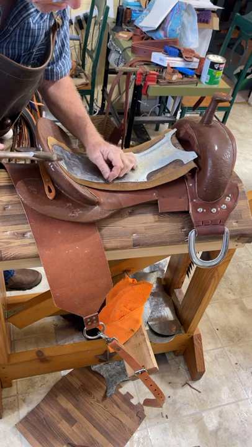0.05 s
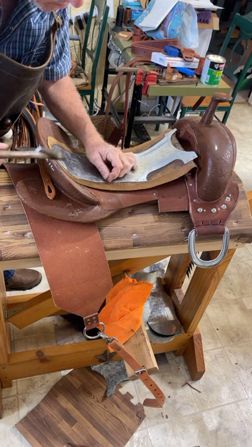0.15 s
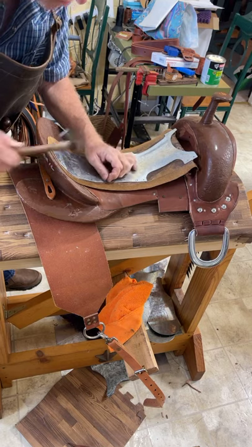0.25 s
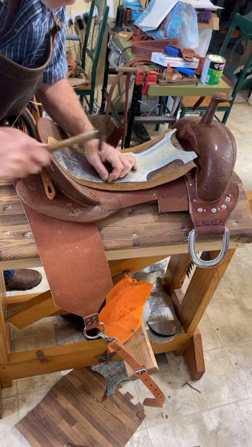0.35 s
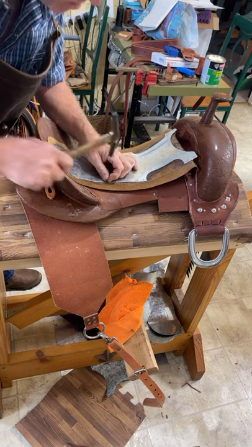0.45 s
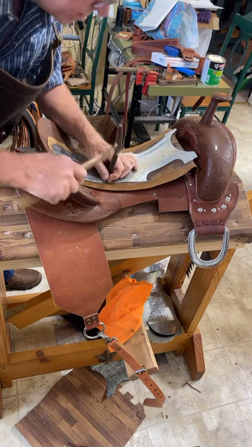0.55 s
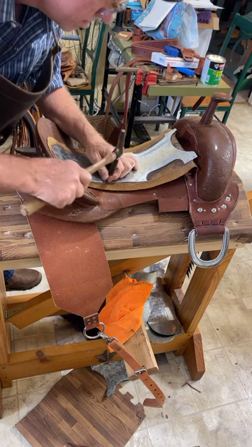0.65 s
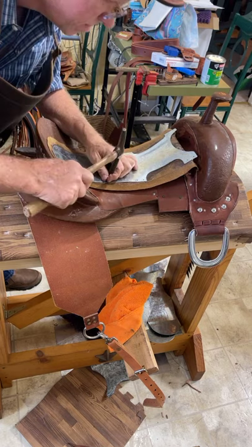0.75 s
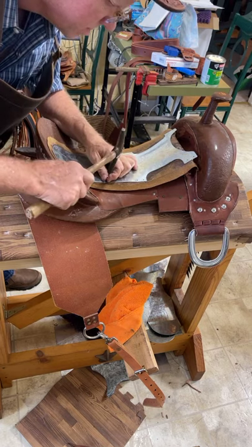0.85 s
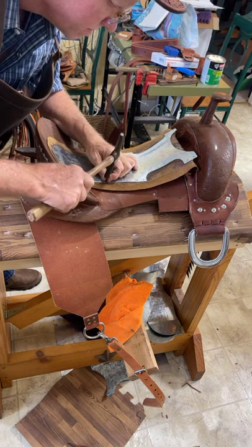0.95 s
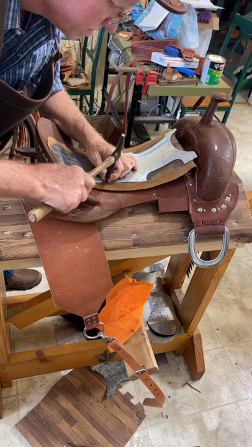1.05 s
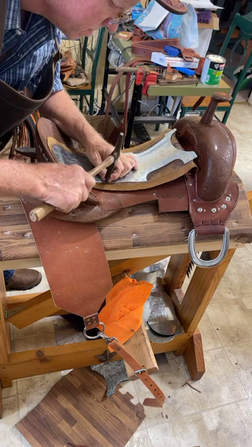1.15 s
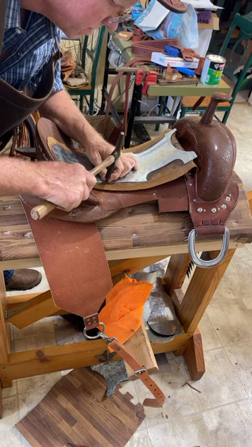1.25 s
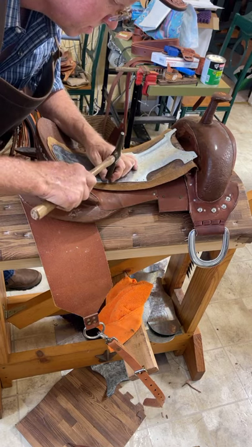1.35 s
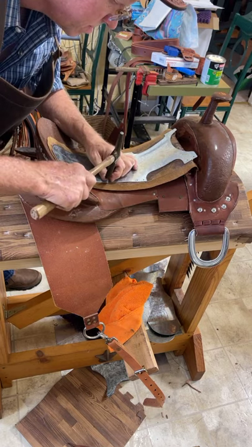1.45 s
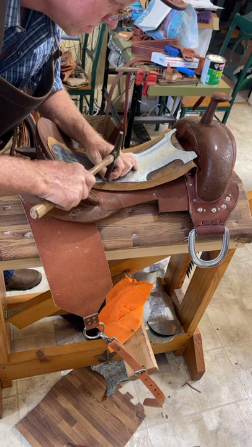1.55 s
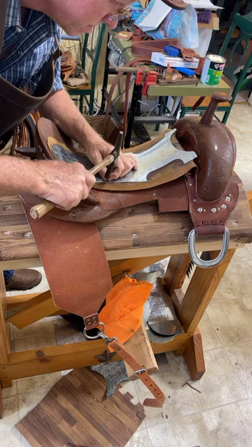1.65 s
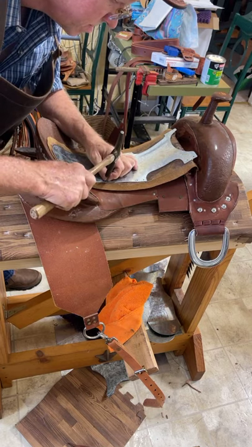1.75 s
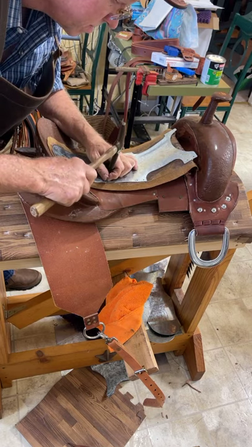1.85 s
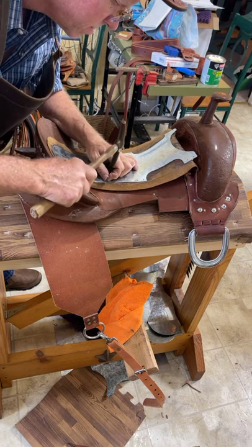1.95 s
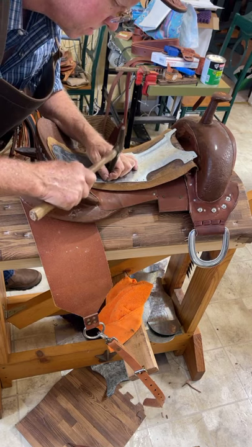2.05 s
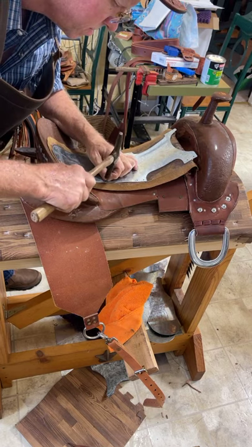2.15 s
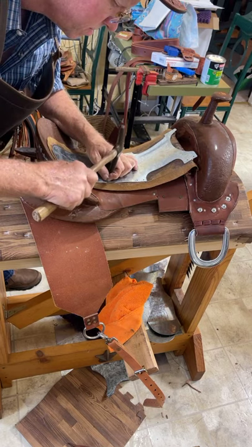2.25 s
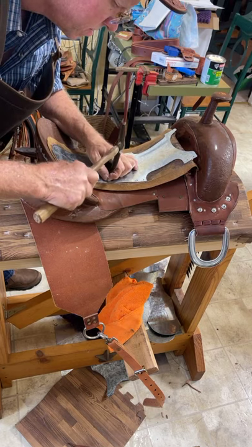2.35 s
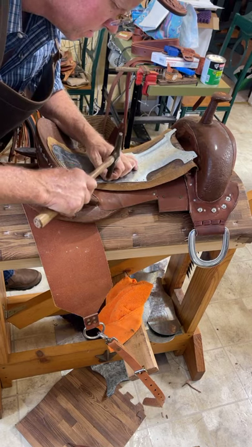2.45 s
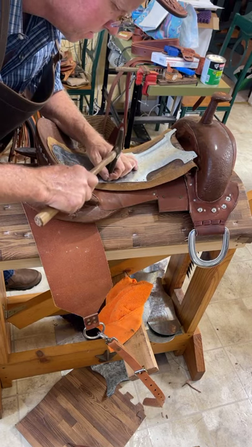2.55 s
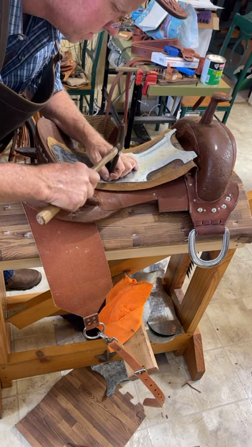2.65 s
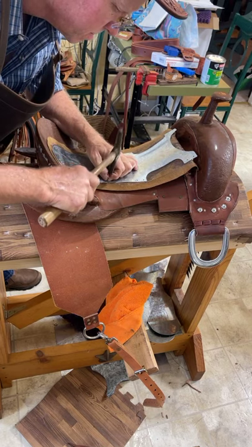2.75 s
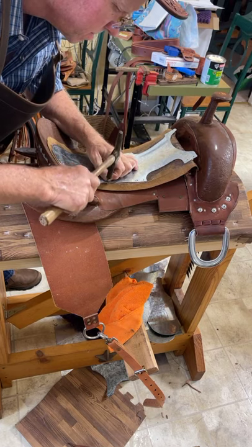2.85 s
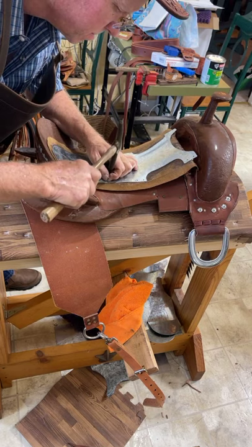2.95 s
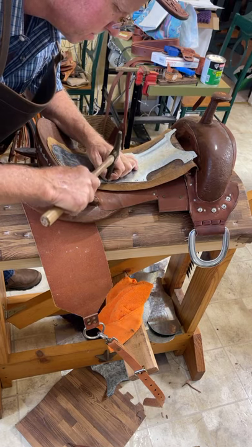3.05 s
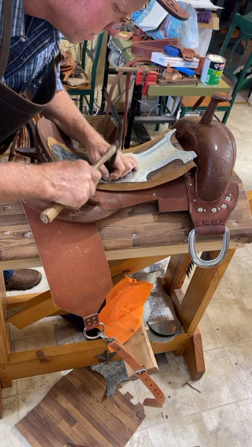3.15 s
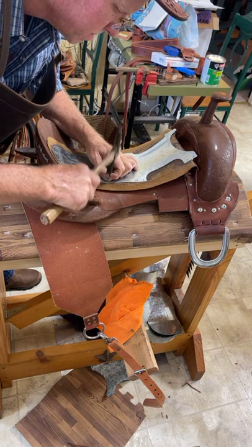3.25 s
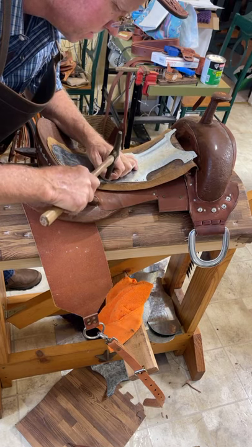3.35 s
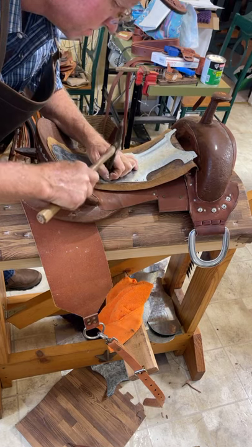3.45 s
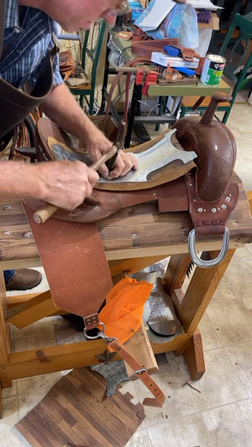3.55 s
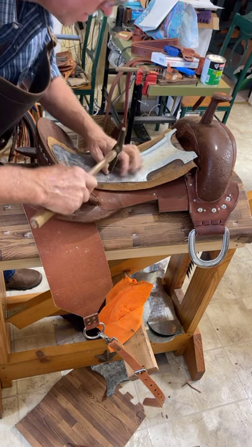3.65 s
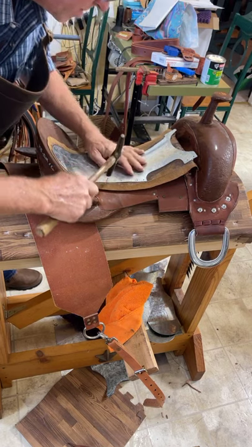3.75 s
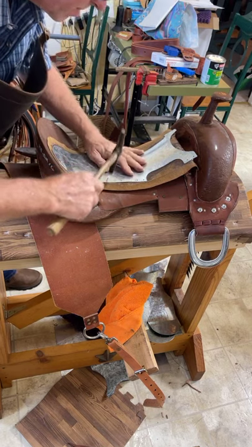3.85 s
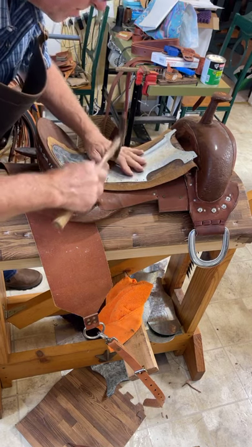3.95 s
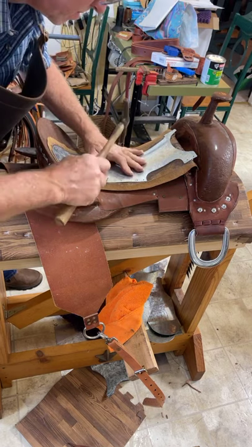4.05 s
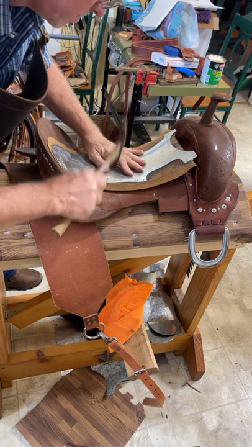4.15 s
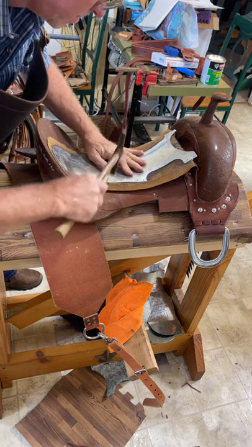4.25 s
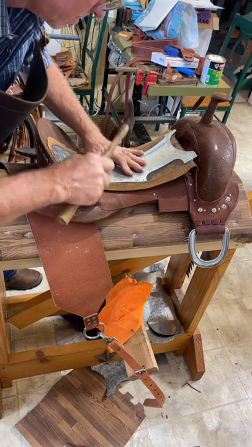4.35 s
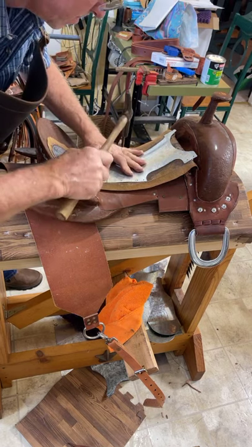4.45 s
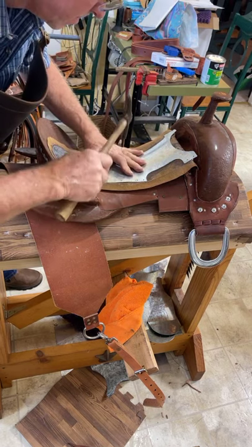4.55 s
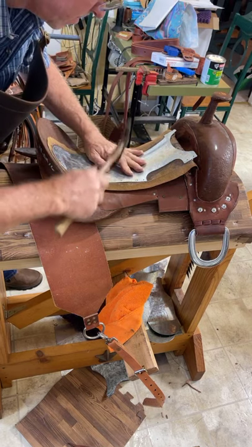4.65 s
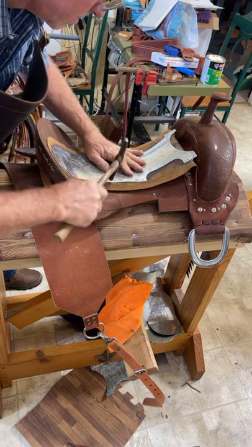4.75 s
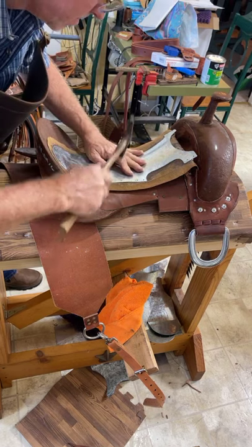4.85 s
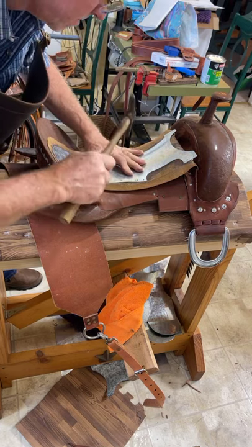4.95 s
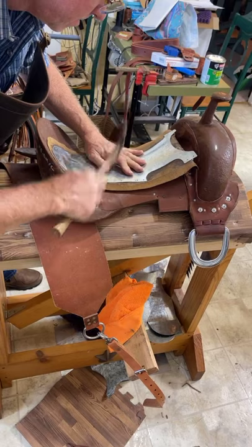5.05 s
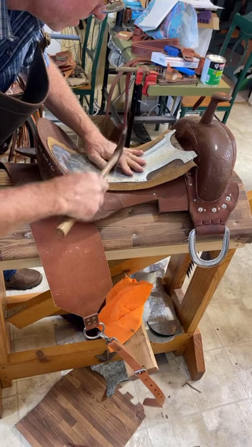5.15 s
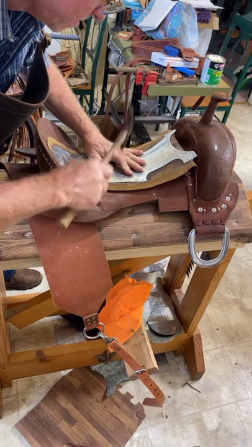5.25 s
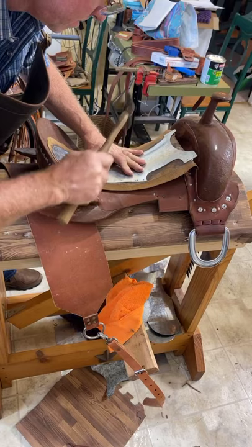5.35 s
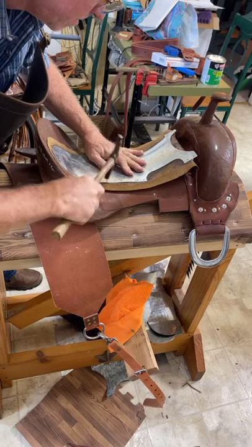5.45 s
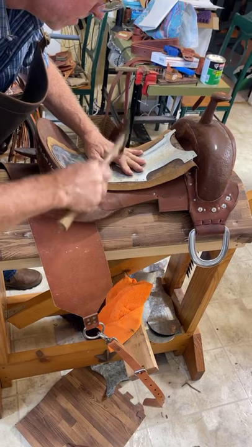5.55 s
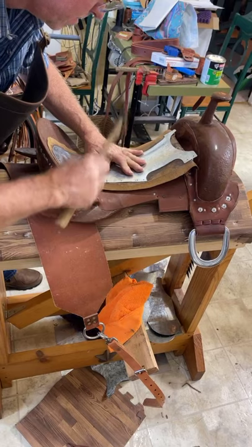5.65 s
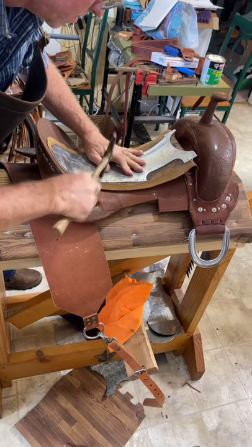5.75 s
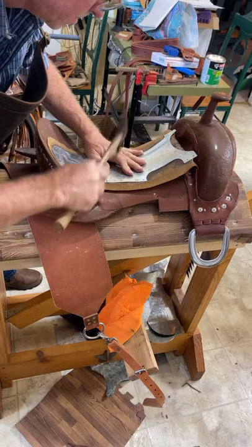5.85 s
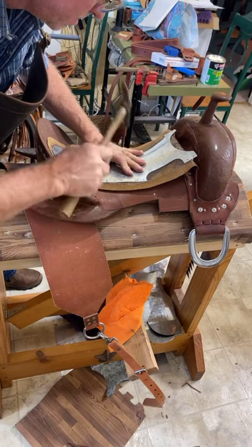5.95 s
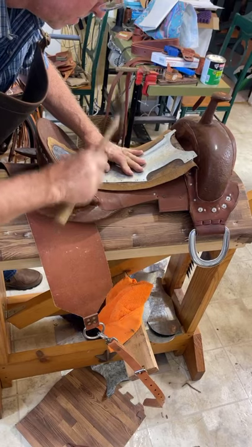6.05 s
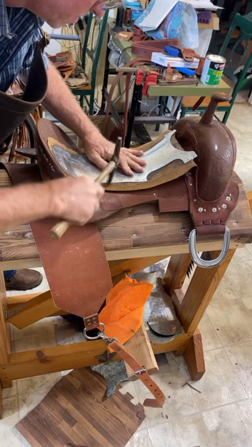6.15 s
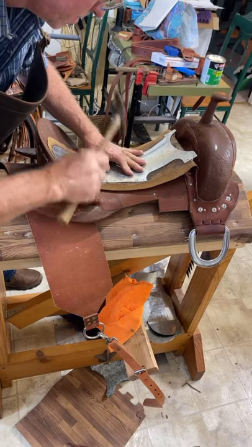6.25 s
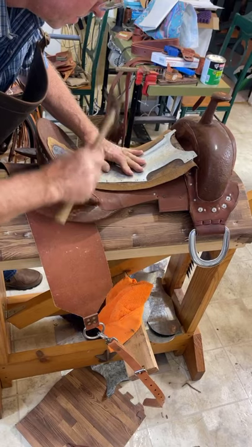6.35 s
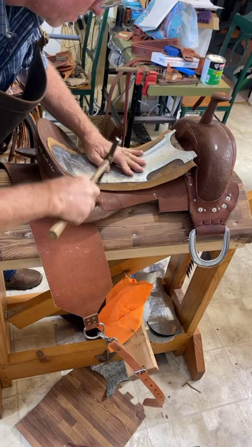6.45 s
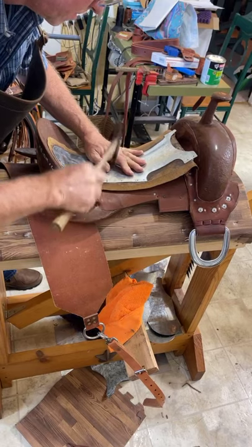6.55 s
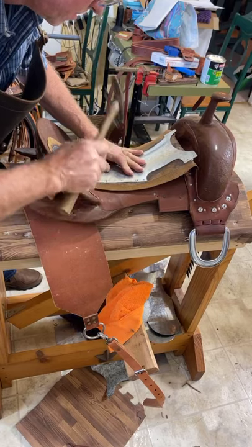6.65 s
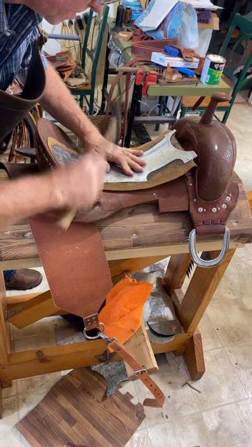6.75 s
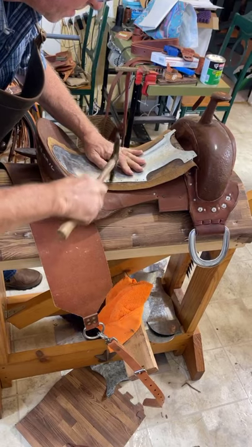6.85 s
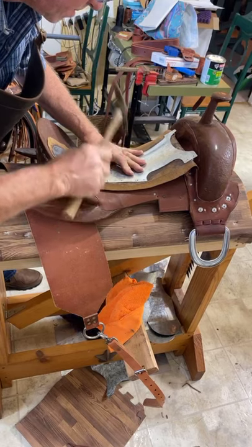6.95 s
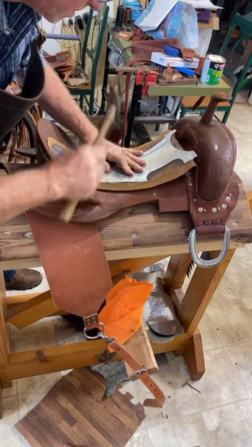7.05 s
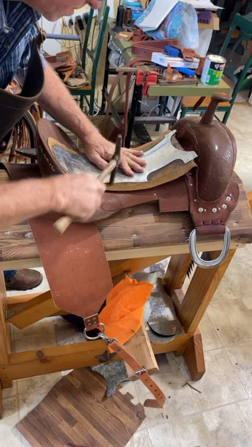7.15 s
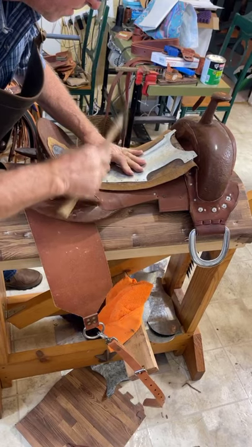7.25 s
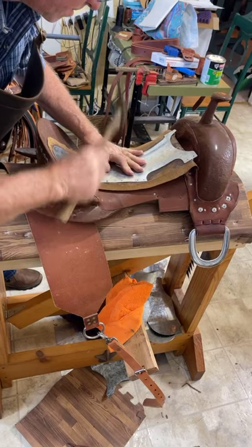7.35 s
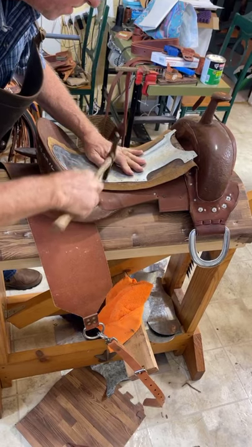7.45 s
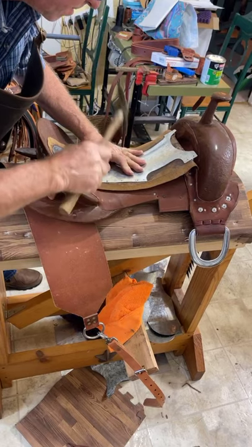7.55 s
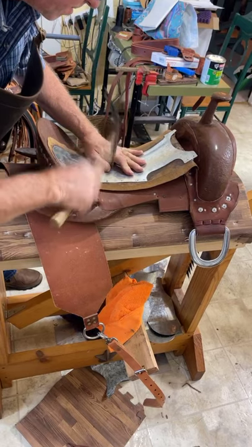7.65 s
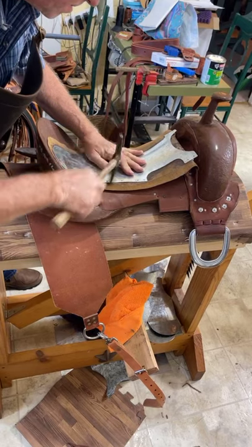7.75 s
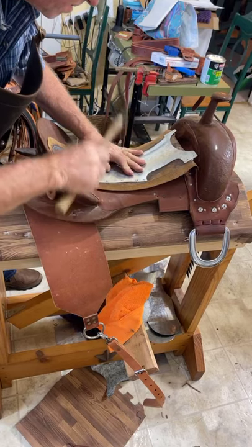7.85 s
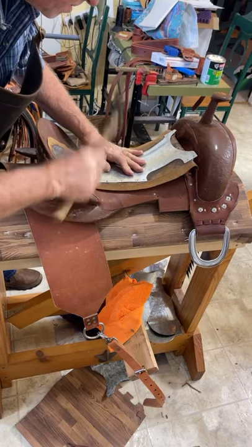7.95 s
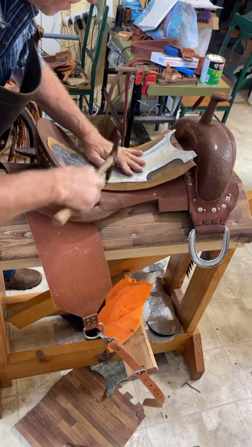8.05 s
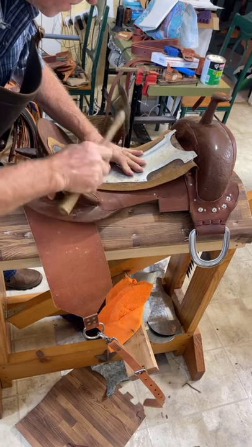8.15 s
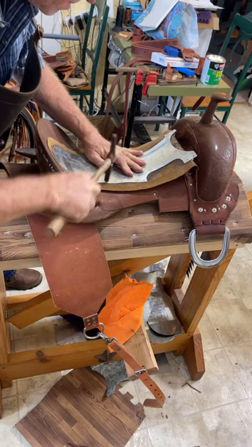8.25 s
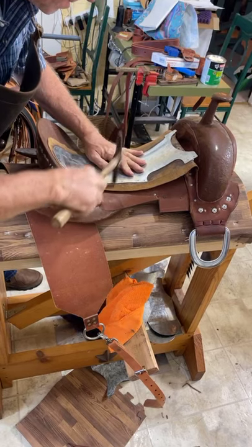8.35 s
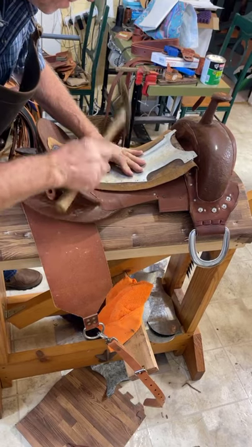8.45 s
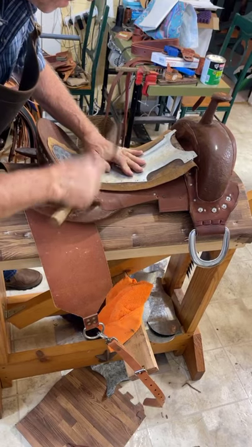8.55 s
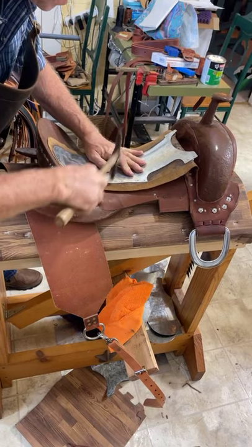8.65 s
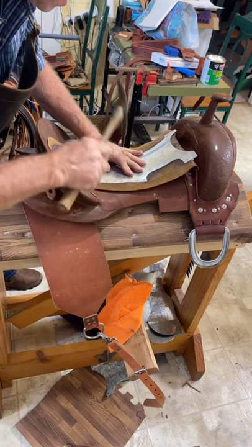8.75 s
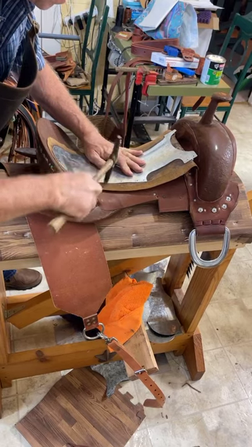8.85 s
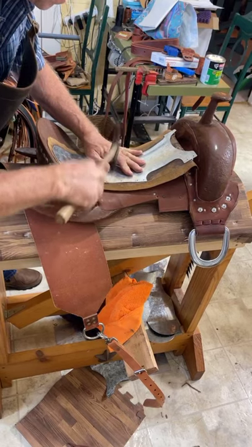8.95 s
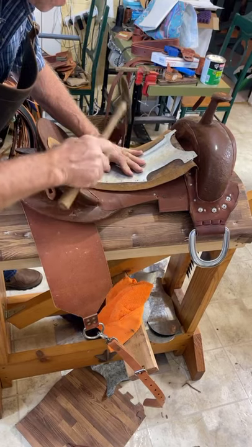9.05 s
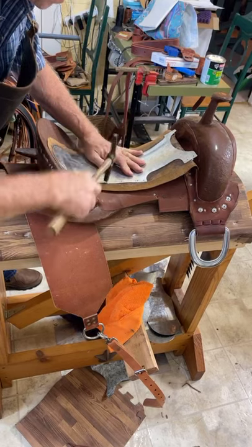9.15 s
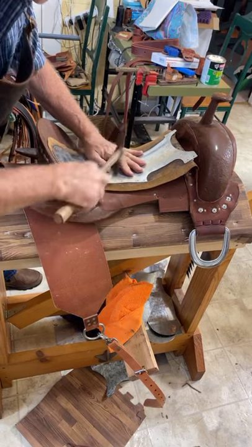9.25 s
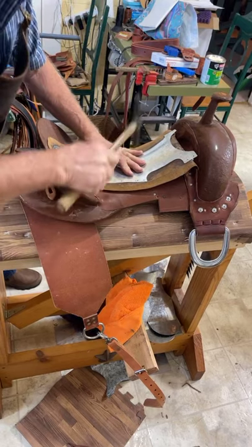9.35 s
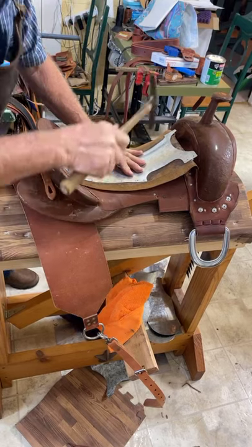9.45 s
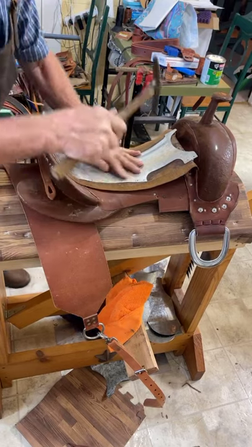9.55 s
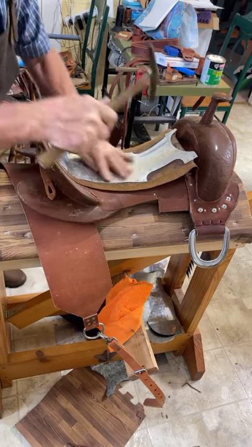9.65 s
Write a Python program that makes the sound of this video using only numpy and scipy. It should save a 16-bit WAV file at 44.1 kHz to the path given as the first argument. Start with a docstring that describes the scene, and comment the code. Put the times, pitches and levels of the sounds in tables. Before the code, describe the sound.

Close microphone in a small, lively workshop. A hammer taps a hand-held metal sheet on a leather saddle, lightly and softly at first, about four a second. After a short pause and a faint sleeve rustle come hard, damped clacks, roughly three a second, with a woody, hollow boom from the saddle. Low air rush and a faint machine hum and whine stay behind; the blows stop shortly before the end.

```python
"""A small workshop, close microphone: a hammer works a piece of sheet metal laid on a leather saddle's seat.
A few light taps come first, then a fast, even run of hard blows.
Shaped noise makes each damped clack; decaying sines make the sheet and the hollow, booming saddle ring.
Reflections and a noise tail make the room; behind it air rushes, a machine hums and whines, a sleeve swishes.
A limiter holds back the hardest blows."""
import sys
import numpy as np
from scipy import signal
from scipy.fft import rfft, irfft, next_fast_len
from scipy.io import wavfile
from scipy.ndimage import uniform_filter1d, minimum_filter1d

SR = 44100
rng = np.random.default_rng(int(sys.argv[2]) if len(sys.argv) > 2 else 0)


def bounce(signal):
    """Save signal as a 16-bit WAV file at the path given by the first command-line argument."""
    frames = np.transpose(np.atleast_2d(signal))
    limited = np.clip(frames, -1, 1)
    pcm = np.round(limited * 32767).astype(np.int16)
    wavfile.write(sys.argv[1], SR, pcm)


N = 427769
CUTOFF_HZ = 15900  # top of the microphone's range
RING_TIME = np.arange(int(0.7 * SR)) / SR  # seconds
# where each part of a blow sits in the contact noise
THUMP_HZ, SEAT_HZ, KNOCK_HZ = 210.3, 393, 865.5


def from_db(db):
    """Decibels to gain."""
    return 10 ** (np.asarray(db) / 20)


def unit_energy(x):
    """Scale to a sum of squares of 1."""
    return x / np.sqrt(np.sum(x ** 2) + 1e-20)


def at_hz(points, hz, axis=1):
    """Read a table's column on a log-frequency axis."""
    points = np.array(points)
    return np.interp(np.log(np.maximum(hz, 1)), np.log(points[:, 0]), points[:, axis])


def level_over_time(points, left=None):
    """Gain over the whole scene from (seconds, dB) points."""
    return from_db(np.interp(np.arange(N) / SR, *np.transpose(points), left=left))


def add(track, s, sound):
    """Mix a sound in at a time in seconds."""
    start = int(s * SR)
    track[start:start + len(sound)] += sound[:N - start]


def coloured(x, db_at, size=8192):
    """Causal (minimum-phase) filter with a given dB curve."""
    cepstrum = irfft(np.log(from_db(db_at(np.fft.rfftfreq(size, 1 / SR)))))
    # folding the cepstrum forward in time makes the phase minimal
    cepstrum[1:size // 2] *= 2
    cepstrum[size // 2 + 1:] = 0
    return irfft(rfft(x, size) * np.exp(rfft(cepstrum)))


def steady_noise(gain_at):
    """Noise of rms 1 with a given spectrum."""
    size = next_fast_len(N, real=True)
    spectrum = rfft(rng.standard_normal(size)) * gain_at(np.fft.rfftfreq(size, 1 / SR))
    return unit_energy(irfft(spectrum, size)[:N]) * np.sqrt(N)


def slow_noise(rate_hz):
    """A random wander of rms 1."""
    return steady_noise(lambda hz: 1 / (1 + (hz / rate_hz) ** 2))


# The rush of air in the workshop. Each row: frequency in Hz, relative density in dB per Hz.
AIR_SPECTRUM = [(20, -64), (35, -30), (55, -11.5), (80, -27), (110, -2.5), (170, -8.5), (400, -2.5),
                (650, -15), (1200, -15.5), (1850, -27), (2800, -27.5), (4700, -31), (8000, -47.5),
                (12000, -58), (15000, -76)]


def air(level_db=-45):
    """A steady rush: noise with a fixed spectrum."""
    return from_db(level_db) * steady_noise(lambda hz: from_db(at_hz(AIR_SPECTRUM, hz)))


# The machine's hum and whine. Each row: frequency in Hz, width in Hz, level in dB before the background's drift.
MACHINE_TONES = [(117, 11, -65), (226.4, 20, -54), (425, 17, -63.5), (921, 42, -59.5), (2385, 101, -57.5),
                 (3570, 130, -67), (3790, 150, -67)]


def machine(waver=0.0061, waver_hz=2.7):
    """Rough hum and whine: noise-modulated tones that waver together with the machine's speed."""
    running_s = np.cumsum(1 + waver * slow_noise(waver_hz)) / SR
    out = 0
    for hz, width, db in MACHINE_TONES:
        phase = 2 * np.pi * hz * running_s
        in_phase = slow_noise(width / 2) * np.cos(phase)
        quadrature = slow_noise(width / 2) * np.sin(phase)
        out = out + from_db(db) * (in_phase + quadrature)
    return out


# How the background drifts. Each row: time in seconds, level in dB.
BACKGROUND_LEVEL = [(0, 0), (3.9, 0), (4.8, -2), (9.7, -3)]


def background():
    """Air and machine share one slowly drifting level."""
    return (air() + machine()) * level_over_time(BACKGROUND_LEVEL)


# The sleeve as the hand flattens on the sheet, and as the arm draws back.
# Each row: time in seconds, level in dB.
SLEEVE_LEVEL = [(3.3, -90), (3.45, -72), (3.72, -74), (3.85, -100), (9.35, -100), (9.44, -85), (9.54, -67),
                (9.6, -69), (9.69, -80)]


def sleeve(centre_hz=8000, width_hz=6000):
    """A soft, bright swish of cloth: a broad band of noise."""
    swish = steady_noise(lambda hz: np.exp(-((hz - centre_hz) / width_hz) ** 2))
    return level_over_time(SLEEVE_LEVEL, left=-np.inf) * swish


# The workshop's reverberation.
# Each row: frequency in Hz, tail energy in dB against the sound sent into the room, t60 in seconds.
ROOM_DECAY = [(60, 0.5, 0.67), (171, 9, 0.37), (388, 5.5, 0.58), (1190, 6.5, 0.49), (2980, 4, 0.53),
              (7740, 2.5, 0.43), (15000, 1.5, 0.28)]


def reverberation(build_up_s, count=30):
    """Diffuse sound of the room, dying band by band; neighbouring bands overlap."""
    size = len(RING_TIME)
    hz = np.fft.rfftfreq(size, 1 / SR)
    white = rfft(rng.standard_normal(size))
    centres = np.geomspace(30, CUTOFF_HZ, count)
    swell = 1 - np.exp(-(RING_TIME / build_up_s) ** 2)
    tail = 0
    for centre, peak in zip(centres, np.eye(count)):
        share = np.interp(hz, centres, peak)
        decay = from_db(-60 * RING_TIME / at_hz(ROOM_DECAY, centre, axis=2))
        band = unit_energy(irfft(white * share, size) * swell * decay)
        tail = tail + band * np.sqrt(np.mean(share ** 2)) * from_db(at_hz(ROOM_DECAY, centre))
    return tail


# First reflections at the microphone. Each row: delay in seconds, level in dB against the direct clack.
FIRST_REFLECTIONS = [(.0042, -12), (.0068, -5), (0.0097, 0), (0.0121, -17)]


def workshop(near, around, rings, clack_db=-7, ring_room_db=-21):
    """Direct sound, reflections from bench, floor and ceiling, then the diffuse tail."""
    early = near.copy()
    for delay, db in FIRST_REFLECTIONS:
        add(early, delay, from_db(db) * near)
    into_room = from_db(clack_db) * around + from_db(ring_room_db) * rings
    diffuse = signal.fftconvolve(into_room, reverberation(build_up_s=0.0037))[:N]
    return rings + from_db(clack_db) * early + diffuse


def ring(hz, level_db, t60, build_up, lag=0):
    """One mode that swells and dies away."""
    t = np.maximum(RING_TIME - lag, 0)
    envelope = from_db(level_db - 60 * t / t60) * (1 - np.exp(-t / build_up))
    return envelope * np.sin(2 * np.pi * hz * t)


def body(modes, level_db, detune, spread_db, stiffening_per_db):
    """Leather stiffens under force, so light taps ring lower; the pressing hand shifts all modes a little."""
    shift, *strengths = rng.standard_normal(len(modes) + 1)
    pitch = 1 + stiffening_per_db * level_db + detune * shift
    out = 0
    for (hz, db, t60, lag, build_up), strength in zip(modes, strengths):
        out = out + ring(hz * pitch, db + level_db + spread_db * strength, t60, build_up, lag)
    return out


# The saddle's frame. Each row: frequency in Hz before stiffening, level in dB against the thump, t60 in seconds,
# lag after the contact in seconds, build-up in seconds.
SADDLE_MODES = [(55.2, -34, 0.48, 0.002, 0.022), (113.3, -32, 0.5, 0.0014, 0.024),
                (130.5, -18.5, 0.26, 0.0031, 0.014), (204.7, -24, 0.12, 0.0031, 0.011),
                (243.8, -13.5, 0.19, 0.0034, 0.022), (277, -10, 0.13, 0.0029, 0.007)]


def saddle(thump_db, spot, edge_frame_db=2.5):
    """The hollow saddle booms; the sheet's edge lies over its frame and rings it harder."""
    level_db = thump_db + (1 - spot) * edge_frame_db
    return body(SADDLE_MODES, level_db, detune=0.008, spread_db=1.6, stiffening_per_db=0.004)


# The seat under the sheet, and a ring of the room that swells late. Each row: frequency in Hz before
# stiffening, level in dB against the seat's level, t60 in seconds, lag in seconds, build-up in seconds.
SEAT_MODES = [(288.6, -1.5, 0.15, 0.0028, 0.0053), (385.6, -10, 0.31, 0.0011, 0.0041),
              (416, -15, 0.15, 0.089, 0.0062)]


def seat(seat_db):
    """Leather seat pressed by the sheet: it rings strongly only under hard blows."""
    return body(SEAT_MODES, seat_db, detune=0.0035, spread_db=0.3, stiffening_per_db=0.0012)


def saddle_levels(force_db, clank_db, spot):
    """Thump and seat ring in dB: both level off under hard blows, where the padding bottoms out."""
    full_db, growth, bottoms_out_db = 2.5, 1.49, -8  # growth in dB per dB of force
    thump_db = full_db - growth * max(bottoms_out_db - force_db, 0)
    # the seat answers best in the middle, where the sheet lies tight
    edge_db, middle_db = -29, -1.17
    clank_drain = 0.24  # dB lost to the seat per dB of clank
    seat_db = thump_db + edge_db + spot * (middle_db - edge_db) - clank_drain * clank_db
    return thump_db, seat_db


# The sheet, held down by a hand. Each row: frequency in Hz, level in dB when struck at its edge,
# level in dB when struck in its middle, t60 in seconds.
SHEET_MODES = [(581.4, -14, -25, 0.19), (659.4, -12.5, -13.5, 0.14), (706.7, -18, -18, 0.17),
               (820, -25, -21, 0.13), (906.5, -7, -15.5, 0.13), (1014, -21, -17.5, 0.094),
               (1122, -14.5, -16, 0.094), (1202, -17.5, -14.5, 0.14), (1268, -21, -19.5, 0.18),
               (1314, -44, -25.5, 0.4), (1408, -38, -25, 0.15), (1536, -23.5, -27.5, 0.16),
               (1850, -8, -38, 0.054), (2087, -23, -25, 0.17), (2260, -18, -16, 0.087),
               (2847, -6, -20, 0.038), (3110, -21, -20, 0.093), (4105, -21, -10.5, 0.021),
               (4340, -16, -14, 0.031), (4810, -21, -17, 0.034)]


def sheet(spot, colour, detune, spread_db, build_up):
    """The spot decides which modes wake; no two blows land alike, so strength and sign vary."""
    chance = rng.standard_normal((len(SHEET_MODES), 3))
    out = 0
    for (hz, edge_db, middle_db, t60), (shift, strength, sign) in zip(SHEET_MODES, chance):
        level_db = edge_db + spot * (middle_db - edge_db) + at_hz(colour, hz) + spread_db * strength
        out = out + np.sign(sign) * ring(hz * (1 + detune * shift), level_db, t60, build_up)
    return out


# The sheet's edge bites, but has less clank and crack than its middle.
# Each row: frequency in Hz, level in dB at the very edge.
EDGE_COLOUR_DB = [(2000, -4), (3100, 2), (4600, 6), (8600, -12)]


def metal_colour(level_db, brightness, spot, tilt_hz=3080):
    """The metal's share of a blow as (Hz, dB): treble above tilt_hz tilted by the hit, more biting to the edge."""
    colour = []
    for hz, edge_db in EDGE_COLOUR_DB:
        octaves_above = max(np.log2(hz / tilt_hz), 0)
        colour.append((hz, level_db + brightness * octaves_above + (1 - spot) * edge_db))
    return colour


def bending_wave(knock_lag_s, size=2048):
    """Bending waves slow down with the root of their pitch: the crack leaves the sheet before the knock."""
    hz = np.fft.rfftfreq(size, 1 / SR)
    # lag grows toward low pitch, held below the thump and counted from the arrival at the cutoff
    slowness = np.sqrt(KNOCK_HZ / np.maximum(hz, THUMP_HZ))
    lag = knock_lag_s * (slowness - np.sqrt(KNOCK_HZ / CUTOFF_HZ))
    phase = 2 * np.pi * np.cumsum(np.maximum(lag, 0)) * SR / size
    return irfft(np.exp(-1j * phase))[:size // 2]


def chatter(rise_s, slap_s, evenness, rattle_db=-19, rattle_s=0.011, size=4096):
    """The sheet slaps on its backing for a few milliseconds, then rattles out in sparse touches."""
    t = np.arange(size) / SR
    slap = rng.standard_normal(size) * np.exp(-t / slap_s)
    touches = rng.standard_normal(size) * (rng.random(size) < 600 / SR)  # about 600 a second
    rattle = unit_energy(touches) * np.sqrt(size) * from_db(rattle_db) * np.exp(-t / rattle_s)
    spectrum = rfft((slap + rattle) * (1 - np.exp(-t / rise_s)))
    # evenness 1 flattens the spectrum, 0 leaves it ragged
    even = irfft(spectrum / (np.abs(spectrum) + 1e-9) ** evenness)
    return unit_energy(even[:size // 2])


# Contact noise of a full blow. Each row: frequency in Hz, level in dB before the blow's own colour.
CONTACT_NOISE = [(30, 9), (55, 23.5), (85, 21.5), (130, 22.5), (180, 21), (270, 32.5), (500, 29),
                 (1200, 25), (1750, 23), (2400, 23.5), (3800, 18), (6500, 13), (10000, 12.5), (16000, 5)]


def contact(wave, colour):
    """Hammer on metal: a bending wave shaped by the contact noise and the blow's colour."""
    return coloured(wave, lambda hz: at_hz(CONTACT_NOISE, hz) + at_hz(colour, hz))


# The hammer moves in toward the middle. Each row: time in seconds, spot from 0 (edge) to 1 (middle).
HAMMER_SPOT = [(4.9, 0.43), (5.45, 1)]
# Hammer blows; a loose patch of sheet clanks more, a square hit is brighter.
# Each row: start in seconds, force in dB, clank in dB against the force, brightness in dB per octave.
HAMMER_BLOWS = [(2.0223, -24, -1.5, 0), (2.4258, -45, 9.5, -7), (2.6954, -17.5, -5, 0.5),
                (2.9674, -17.5, 1, -1), (3.2196, -16, -1, -1), (3.79, -42, 2.5, 5), (4.1019, -4, 0, 1.4),
                (4.6083, -11, 2.1, -.9), (5.0209, -8, 5.5, -1.3), (5.3501, -5.5, -2, 2),
                (5.6450, -1.5, 2, 0), (6.0296, -2, -4, 0.5), (6.3601, 1.5, -5, 0.8), (6.7066, 2.5, -6, 1.4),
                (7.0264, -2, 6, -7), (7.3148, 2, 1.6, -5), (7.619, 2, 2, -4), (7.907, 2.2, 2, -3.5),
                (8.1985, 2.5, 0, -1.5), (8.4917, 2.5, -.5, -0.7), (8.778, 2, -0.5, -.4),
                (9.064, 2.2, -.5, -1.7)]


def hammering(edge_room_db=-2.5):
    """All blows: the clack toward the microphone, the clack into the room, the ringing of sheet and saddle."""
    near, around, rings = np.zeros((3, N))
    wave = bending_wave(knock_lag_s=0.0033)
    for s, force_db, clank_db, brightness in HAMMER_BLOWS:
        spot = np.interp(s, *np.transpose(HAMMER_SPOT))
        thump_db, seat_db = saddle_levels(force_db, clank_db, spot)
        colour = [(THUMP_HZ, thump_db), (SEAT_HZ, seat_db), (KNOCK_HZ, force_db)]
        colour += metal_colour(force_db + clank_db, brightness, spot)
        clack = contact(wave, colour)
        # in any one direction the sheet radiates unevenly; over all directions this evens out
        direct = signal.fftconvolve(clack, chatter(rise_s=0.00077, slap_s=0.0012, evenness=0.32))
        spread = signal.fftconvolve(clack, chatter(rise_s=0.00087, slap_s=0.0023, evenness=0.91))
        add(near, s, direct)
        # a blow on the narrow edge sounds drier than one on the broad middle
        add(around, s, from_db(edge_room_db * (1 - spot)) * spread)
        add(rings, s, sheet(spot, colour, detune=0.007, spread_db=1.0, build_up=0.0046))
        add(rings, s, saddle(thump_db, spot))
        add(rings, s, seat(seat_db))
    return near, around, rings


def scene():
    """The hammering in its room over the background, with the sleeve."""
    return (background() + sleeve() + workshop(*hammering()))[None]


def limiter(x, ceiling_db, release_db_per_s, size=45):
    """Peaks over the ceiling pull the gain down a millisecond ahead; it recovers quickly."""
    over = np.maximum(20 * np.log10(np.abs(x) + 1e-9) - ceiling_db, 0)
    ramp = release_db_per_s * np.arange(N) / SR
    gain_db = ramp - np.maximum.accumulate(over + ramp, axis=-1)
    return x * from_db(uniform_filter1d(minimum_filter1d(gain_db, size), size))


def record(dry):
    """The close microphone's fast limiter, then a steep low-pass cuts the top."""
    limited = limiter(dry, ceiling_db=-0.7, release_db_per_s=602)
    low_pass = signal.ellip(10, 0.1, 80, CUTOFF_HZ, fs=SR, output="sos")
    return signal.sosfilt(low_pass, limited)


dry = scene()
out = record(dry)
bounce(out)
```